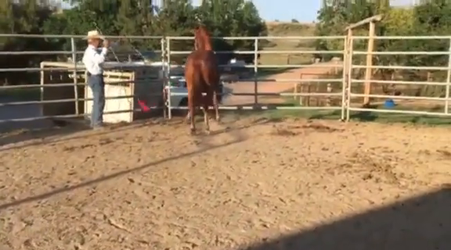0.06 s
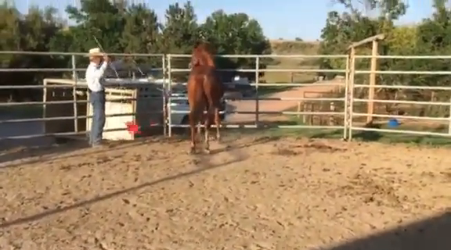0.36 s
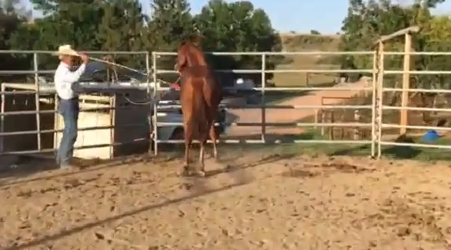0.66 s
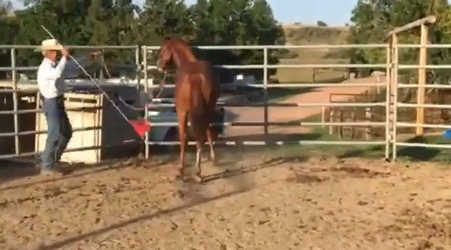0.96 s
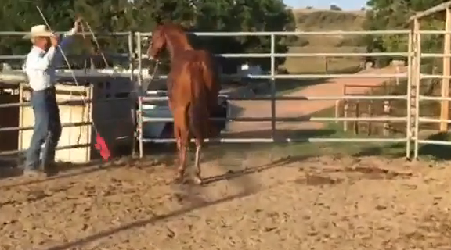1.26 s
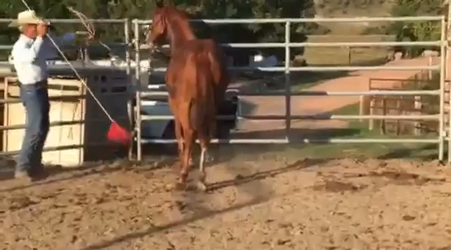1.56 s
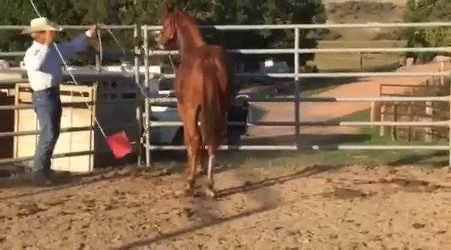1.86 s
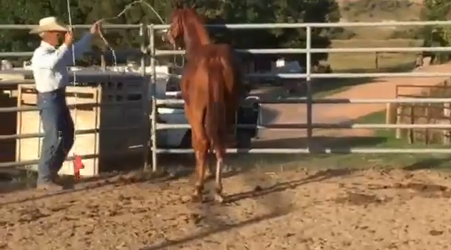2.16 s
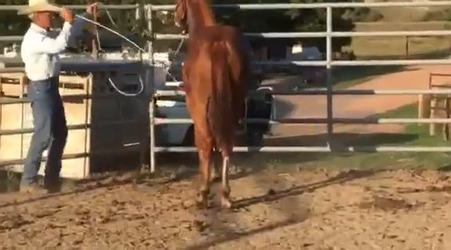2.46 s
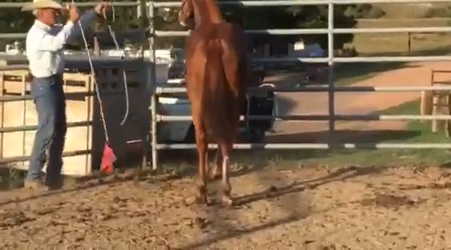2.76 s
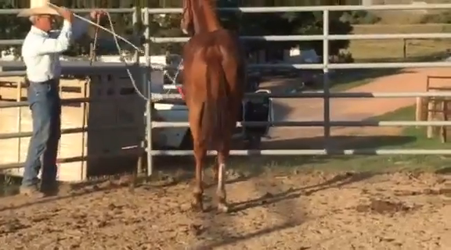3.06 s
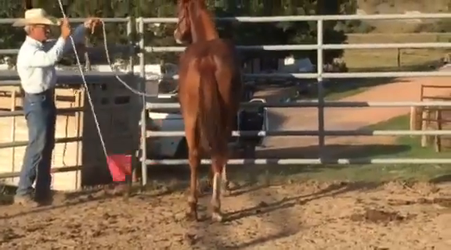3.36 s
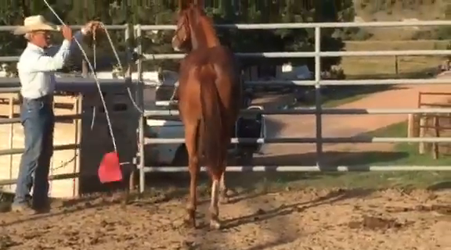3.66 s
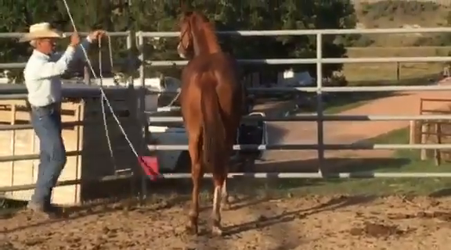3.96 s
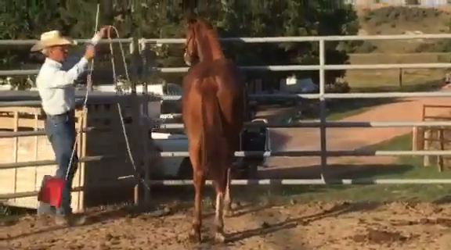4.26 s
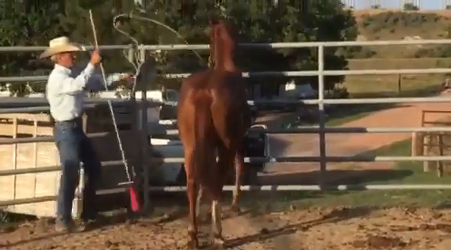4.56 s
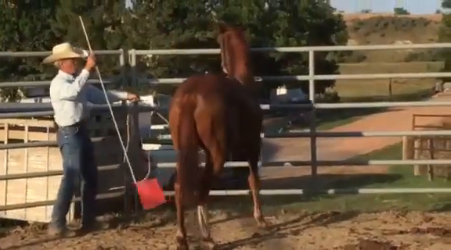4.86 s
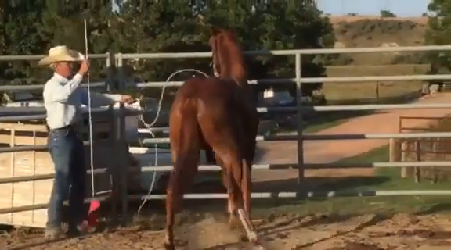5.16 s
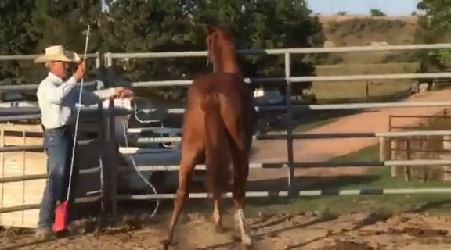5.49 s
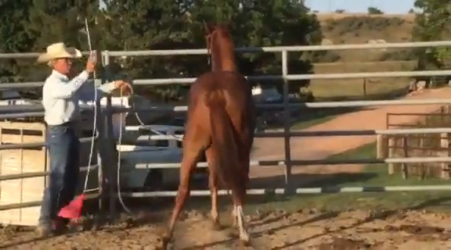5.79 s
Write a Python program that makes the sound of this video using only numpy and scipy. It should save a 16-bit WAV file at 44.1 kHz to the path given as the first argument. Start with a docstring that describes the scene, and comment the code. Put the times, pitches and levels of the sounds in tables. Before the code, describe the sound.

Uneven hoof thuds, taps and gritty scuffs on soil, broken by three sharp knocks on a humming, rattling metal fence.

```python
"""Young horse in a pen

A young horse shifts about a dirt pen: hooves thud on the soil, tap, scuff through grit and kick up dirt.
Three sharp knocks land on the metal fence panels, which hum and rattle; once a steel fitting clinks.
The yard answers with a far slap and a thin tail of echo, over quiet outdoor air."""
import sys
import numpy as np
from scipy import signal
from scipy.fft import rfft, irfft, next_fast_len
from scipy.io import wavfile
from scipy.ndimage import map_coordinates

SR = 44100
rng = np.random.default_rng(int(sys.argv[2]) if len(sys.argv) > 2 else 0)


def inscribe(sig):
    """Save sig as 16-bit PCM at rate SR to the path in sys.argv[1].

    A 1-D sig is mono; a 2-D sig holds one channel per row.
    Samples are clipped to [-1, 1] before scaling.
    """
    pcm = np.round(np.clip(np.atleast_2d(sig).T, -1, 1) * 32767)
    wavfile.write(sys.argv[1], SR, pcm.astype(np.int16))


N = 261513


def amp(db):
    """Turn decibels into a volume multiplier."""
    return 10 ** (np.asarray(db) / 20)


def fade(t, fade_s):
    """Die away by 60 dB every fade_s seconds."""
    return amp(-60 * t / fade_s)


def unit(x):
    """Scale x to an average strength (rms) of 1."""
    return x / np.sqrt(np.mean(x ** 2) + 1e-20)


def along(points, hz):
    """Read between the rows of a (pitch_hz, value) table, on a musical pitch scale."""
    pitches, values = np.transpose(points)
    return np.interp(np.log(hz + 1), np.log(pitches + 1), values)


def seconds(length_s):
    """The time of each sample."""
    return np.arange(int(length_s * SR)) / SR


def add(track, start_s, x):
    """Mix x into the track at start_s."""
    start = max(0, round(start_s * SR))
    track[start:start + len(x)] += x[:max(0, N - start)]


def filtered(x, response):
    """Turn each pitch in x up or down by response(hz)."""
    size = next_fast_len(len(x) + 8192)
    return irfft(rfft(x, size) * response(np.fft.rfftfreq(size, 1 / SR)), size)[:len(x)]


def wobble(size, per_s):
    """A smooth curve through per_s random points a second."""
    return map_coordinates(rng.standard_normal(2048), [np.arange(size) * per_s / SR], mode="wrap")


def noise(tone, size, grain_db=0):
    """Noise shaped by a tone table; grain_db clumps it into grains about a millisecond long."""
    clumps = np.tanh(wobble(size, 1000))
    grainy = rng.standard_normal(size) * amp(grain_db * clumps)
    return unit(filtered(grainy, lambda hz: amp(along(tone, hz))))


# the tone of outdoor air: pitch_hz, level_db
AIR_TONE = [(15, -43.5), (25, -16), (58, 6.5), (80, 5), (351, -8.5), (709, -11.5), (840, -12.5),
            (1120, -13), (2380, -15.5), (2540, -11), (2700, -18), (4810, -21.5), (6750, -24), (7620, -24.5),
            (8200, -46), (10700, -70), (18000, -120)]


def air():
    """Quiet outdoor air whose level drifts a little."""
    return amp(-67.5 + .99 * wobble(N, 4)) * noise(AIR_TONE, N, grain_db=.5)


# how long the yard echoes: pitch_hz, fade_s
YARD_FADES = [(100, 0.43), (500, .5), (1500, 0.68), (4000, 1), (8000, 0.2)]


def yard_echo(x):
    """Trees and sheds scatter the sound back as a thin tail."""
    hz, t, bands = signal.stft(rng.standard_normal(SR), SR, nperseg=256)
    tail = signal.istft(bands * fade(t, along(YARD_FADES, hz)[:, None]), SR, nperseg=256)[1]
    return amp(-25) * signal.fftconvolve(x, tail / np.linalg.norm(tail))[:N]


# steel touching steel: start_s, level_db
STEEL_TOUCHES = [(2.118, -46.5), (2.129, -41.5)]
# the notes the steel rings with: pitch_hz, level_db, fade_s
STEEL_NOTES = [(1729.4, -2.5, 2.7), (1883, -11.5, 1.1), (1960, -8.5, 1.2), (2350, -10.5, 0.89),
               (2470, -9.5, 0.61), (2850, -6.5, 0.5), (3160, -9, 0.67), (3224, -10.5, 0.51),
               (3733, -7.5, 0.15), (4020, -19, 0.52), (4496, -31, .55), (5100, -15, 0.32),
               (5270, -8.5, 0.4), (5300, -8.5, 0.38), (5300, -5.5, 0.49), (5400, -8.5, 0.67),
               (5800, -11.5, 0.27), (6870, -5.5, 0.095), (7550, -25, .4), (7530, -10, 0.22)]
# the tone of its jingle: pitch_hz, level_db
JINGLE_TONE = [(900, -30), (1500, -14.5), (1800, 2), (2400, -4.5), (3300, -5), (4300, -5.5), (5200, -3.5),
               (5800, 0), (6900, -5), (7700, -13.5), (8300, -10)]


def clinks():
    """A loose steel fitting jingles; its notes flutter as it keeps chattering against the rail."""
    out, t = np.zeros(N), seconds(2)
    for start_s, level_db in STEEL_TOUCHES:
        strike, jangle = 1.2 * fade(t, .053), .6 * fade(t, .37)
        ring = noise(JINGLE_TONE, len(t), grain_db=2) * (strike + jangle)
        for hz, note_db, fade_s in STEEL_NOTES:
            steady = .4 * np.exp(2j * np.pi * rng.random())
            flutter = .36 * (wobble(len(t), 85) + 1j * wobble(len(t), 85))
            note = np.real((steady + flutter) * np.exp(2j * np.pi * hz * t))
            ring += amp(note_db) * fade(t, fade_s) * note
        add(out, start_s, amp(level_db) * ring)
    return out


# the tones of falling clods and of sand: pitch_hz, level_db
CLOD_TONE = [(40, -10), (120, 10), (200, 1), (290, 8.5), (400, -5), (600, -4), (1000, -50)]
SAND_TONE = [(300, -1.5), (600, -4.5), (1200, -1.5), (1900, -5.5), (2600, -16), (3600, -21), (4500, -28.5),
             (8000, -42)]


def dirt_spray(start_s=1.392, rise_s=.081):
    """Kicked-up dirt patters down: dull clods and a wash of sand swell together and die away."""
    out, t = np.zeros(N), seconds(.5)
    swell = np.minimum(t / rise_s, 1) ** 1.23
    since_peak = np.maximum(t - rise_s, 0)
    clods = amp(-45) * fade(since_peak, .43) * noise(CLOD_TONE, len(t), grain_db=11)
    sand = amp(-43) * fade(since_peak, .31) * noise(SAND_TONE, len(t), grain_db=3.5)
    add(out, start_s, swell * (clods + sand))
    return out


def hoof_hollow(x, pitch_hz=1260, bounce=.68):
    """Sound bounces in the hollow under a hoof; its note sinks as the gap opens."""
    t = np.arange(len(x)) / SR
    round_trip = lambda hz: bounce * np.exp(-2j * np.pi * hz / pitch_hz) / (1 + (hz / 7500) ** 2)
    ringing = filtered(x, lambda hz: 1 / (1 - round_trip(hz)))
    speed = .82 + .18 * np.exp(-t / .08)  # slowing down lowers the pitch
    return unit(map_coordinates(ringing, [np.cumsum(speed)]))


# the tones of shoved soil, a scraping hoof and scattered grit: pitch_hz, level_db
SOIL_TONE = [(40, -13.5), (130, -4.5), (300, -0.5), (550, 0), (900, -18), (2000, -53.5)]
SCRAPE_TONE = [(300, -30), (490, -13), (630, 3), (800, -1), (1150, -8.5), (1700, -2.5), (2500, -19.5),
               (4500, -36.5)]
GRIT_TONE = [(1500, -20.5), (2200, -20), (2750, 7), (4300, -4), (5600, -7), (7000, -6), (8200, -13)]


def scuff(length_s, level_db, depth):
    """A dragged hoof scatters grit (depth 0), scrapes (about halfway) or shoves soil (depth 1)."""
    t = seconds(.5)
    share = lambda loudest_depth: amp(-33 * (depth - loudest_depth) ** 2)
    bite = 1 - np.exp(-(t / (.23 * length_s)) ** 2)
    stroke = 1.3 * bite * np.exp(-(t / (.97 * length_s)) ** 1.9)
    settle = bite * amp(-12.5) * fade(t, .09)  # loose dirt coming to rest
    soil = share(1) * noise(SOIL_TONE, len(t), grain_db=5)
    scrape = share(.55) * hoof_hollow(noise(SCRAPE_TONE, len(t), grain_db=4))
    grit = share(.02) * hoof_hollow(noise(GRIT_TONE, len(t), grain_db=9))
    return amp(level_db) * (stroke * soil + (stroke + settle) * (scrape + grit))


# hooves scuffing dirt: start_s, length_s, level_db, depth (0 to 1)
HOOF_SCUFFS = [(0.056, .047, -51, 0.34), (0.128, .035, -55, 1), (0.246, .085, -56, 0.63),
               (.334, .017, -51, 0.056), (0.426, 0.041, -64, 0.33), (.602, .016, -47.5, 0.017),
               (.634, .035, -61, .9), (.835, .025, -54.5, 0.91), (0.859, .029, -48.5, 0.2),
               (.904, .045, -57.5, 0.65), (1.113, .018, -56, 1), (1.162, .025, -53, 0.017),
               (1.204, .037, -56, .72), (1.767, .034, -52.5, 0.27), (2.023, .075, -52, 0.43),
               (2.287, .045, -54, 0.42), (2.382, 0.028, -62.5, .42), (2.493, .05, -61, .85),
               (2.583, .03, -48.5, .38), (2.931, 0.029, -59, 0.147), (3.039, .03, -57.5, 0.62),
               (3.498, .035, -54.5, 0.46), (3.688, .012, -54, .55), (3.71, .04, -59, .6),
               (4.18, .045, -54.5, 0.48), (4.408, .03, -52.5, 0.45), (4.659, .042, -51, 0.53),
               (4.906, 0.012, -41.5, 0.41), (4.914, .05, -51, 0.55), (5.061, .03, -58.5, 0.47),
               (5.181, .016, -52, 0.27), (5.383, .024, -51, .35), (5.415, 0.07, -62, .45),
               (5.498, 0.0081, -47.5, 0.96)]


def scuffs(shuffles_per_s=.78):
    """Hooves drag through the dirt, with faint shifts of weight at random times."""
    out = np.zeros(N)
    for start_s, length_s, level_db, depth in HOOF_SCUFFS:
        add(out, start_s, scuff(length_s, level_db, depth))
    shuffles = rng.random((int(shuffles_per_s * N / SR), 2))
    for k, (offset, depth) in enumerate(shuffles):
        add(out, (k + offset) / shuffles_per_s, scuff(length_s=.025, level_db=-71, depth=depth))
    return out


# the tone of a dull crunch, as of crushed soil: pitch_hz, level_db
CRUSH_TONE = [(40, -14), (130, -11), (290, 2.5), (400, 2), (520, -6), (900, -20), (2000, -50.5)]


def push(start_hz, fade_s, rest_hz=63, sink_s=.0034):
    """A dull push whose pitch sinks quickly; a faster blow starts higher and crunches more."""
    t = seconds(.25)
    pitch_hz = rest_hz + (start_hz - rest_hz) * np.exp(-t / sink_s)
    thump = -np.sin(2 * np.pi * np.cumsum(pitch_hz) / SR) * fade(t, fade_s)
    crush_shape = amp(-12) * fade(t, .067) * (1 - np.exp(-t / .0005))
    return thump + start_hz / 330 * crush_shape * noise(CRUSH_TONE, len(t))


# dull thuds of hooves landing on soil, and one low bump of the fence panel:
# start_s, level_db, start_pitch_hz, fade_s
DULL_THUDS = [(0.068, -46.5, 202, .11), (.523, -43.5, 170, .19), (.616, -33.5, 330, .1),
              (1.3576, -28.5, 260, .025), (1.3692, -35, 260, .12), (2.269, -33, 330, .075),
              (2.6126, -36.5, 560, .03), (2.691, -37, 380, .08), (2.978, -47.5, 220, .04),
              (4.327, -34, 169.2, .12), (4.678, -36, 300, .1), (4.912, -44, 350, .065),
              (5.5014, -32, 330, 0.16)]


def thuds():
    """The soil, or once the fence panel, gives under a blow; soft ground gives for longer."""
    out = np.zeros(N)
    for start_s, level_db, start_hz, fade_s in DULL_THUDS:
        add(out, start_s, amp(level_db) * push(start_hz, fade_s))
    return out


# the tone of a hoof's sharp crack: pitch_hz, level_db
CRACK_TONE = [(300, -22.5), (540, -32), (820, -1), (1100, 8.5), (1450, -7.5), (1900, 10.5), (2600, -4.5),
              (3400, -3.5), (4500, -8), (6500, -15), (8000, -27.5)]


def hoof_hit(pitch_hz, ring_db, crack_db):
    """One hard touch makes the hoof ring for a moment under a brief crack."""
    t = seconds(.1)
    ring = np.sin(2 * np.pi * pitch_hz * t) * fade(t, .012) * (1 - np.exp(-(t / .0014) ** 2))
    crack_fade = fade(t, .0089) + amp(-14.5) * fade(t, .055)
    crack = noise(CRACK_TONE, len(t)) * crack_fade * (1 - np.exp(-t / .0002))
    return amp(ring_db) * ring / np.abs(ring).max() + amp(crack_db) * crack


# light hoof taps: start_s, ring_db, pitch_hz, crack_db
HOOF_TAPS = [(0.065, -40, 1020, -46), (.373, -49.5, 1130, -51.5), (.819, -39, 910, -60),
             (.855, -41, 587, -80), (0.868, -58, 1310, -41.5), (.9498, -34, 1250, -60),
             (1.3681, -36.5, 720, -41), (2.023, -47, 990, -55), (2.2695, -44, 1050, -48),
             (2.6125, -34, 720, -42), (3.31, -32, 1760, -31), (4.912, -55, 1190, -41),
             (5.5005, -42.5, 1000, -46.5)]


def taps():
    """A hoof lightly touches something hard."""
    out = np.zeros(N)
    for start_s, ring_db, pitch_hz, crack_db in HOOF_TAPS:
        add(out, start_s, hoof_hit(pitch_hz, ring_db, crack_db))
    return out


# blows that shake the fence panels: start_s, hum_db, rumble_db, rattle_db
PANEL_BLOWS = [(2.291, -51.5, -57.5, -53), (2.666, -51.5, -48.5, -31.5), (3.282, -43.5, -48, -31.5),
               (3.978, -30, -43.5, -30.5), (4.331, -61, -52.5, -73)]
# the low notes of a bending panel: pitch_hz, level_db, fade_s
PANEL_NOTES = [(60.3, -2.5, 1), (126, -6.5, 0.53), (213, -20, 0.3), (276, -10, 0.32), (398, -19, 0.099)]
# the tones of its rumble and its rattling joints: pitch_hz, level_db
RUMBLE_TONE = [(40, -12), (90, 4), (170, 5), (290, 0), (390, -18), (520, -40)]
RATTLE_TONE = [(200, -9.5), (550, -16), (800, -10), (1100, -3.5), (1600, 3.5), (2100, -5.5), (2320, -7),
               (2600, -8.5), (3300, -12.5), (4500, -17), (5200, -20.5), (8000, -29.5)]


def panels():
    """A struck panel bends back and forth, humming and rumbling while its loose joints rattle."""
    out, t = np.zeros(N), seconds(.89)
    rise = 1 - np.exp(-t / .0065)
    ticks_per_s = 90
    for start_s, hum_db, rumble_db, rattle_db in PANEL_BLOWS:
        hum = sum(amp(db) * fade(t, fade_s) * np.sin(2 * np.pi * hz * t)
                  for hz, db, fade_s in PANEL_NOTES)
        rumble = noise(RUMBLE_TONE, len(t), grain_db=-.5) * fade(t, .43)
        # single ticks of the joints stand out of the dense chatter
        clicks = (rng.random(len(t)) < ticks_per_s / SR) * rng.uniform(-1, 1, len(t))
        ticks = unit(filtered(clicks, lambda hz: amp(along(RATTLE_TONE, hz))))
        chatter = noise(RATTLE_TONE, len(t)) * amp(.89 * np.tanh(wobble(len(t), 120)))
        rattle_tail = (1.1 * chatter + .5 * ticks) * amp(-9) * fade(t, .52)
        rattle = chatter * fade(t, .08) + rattle_tail
        shake = amp(hum_db) * hum + amp(rumble_db) * rumble + amp(rattle_db) * rattle
        add(out, start_s, shake * rise)
    return out


# a hoof striking the fence, three quick touches each time:
# start_s, gap_s, first_db, second_db, third_db, first_pitch_hz, crack_db, push_db, slap_db
FENCE_KNOCKS = [(2.659, 0.004, -23.5, -3, -14.5, 985, -12, -16, -27.5),
                (3.268, 0.0061, -11, -13, -5, 870, -7.5, -19, -22.5),
                (3.9693, .0064, -26.5, -6, -27.5, 985, -9.5, -27.5, -22.5)]


def knocks(slap_delay_s=.0848):
    """The hoof brushes the dirt, then chatters against the fence with the leg's weight behind it."""
    out = np.zeros(N)
    for start_s, gap_s, *touches_db, first_hz, crack_db, push_db, slap_db in FENCE_KNOCKS:
        add(out, start_s - .013, scuff(length_s=.012, level_db=-52.5, depth=.65))
        add(out, start_s + gap_s / 2, amp(push_db) * push(start_hz=300, fade_s=.023))
        for k, touch_db in enumerate(touches_db):
            touch_s = start_s + k * gap_s
            pitch_hz = first_hz * 1.09 ** k  # higher as the hoof closes on the rail
            touch = hoof_hit(pitch_hz, touch_db, crack_db + .42 * touch_db)  # even light touches crack
            add(out, touch_s, touch)
            if touch_db == max(touches_db):  # a far wall slaps back the hardest touch
                add(out, touch_s + slap_delay_s, amp(slap_db) * touch)
    return out


def scene():
    """Horse and fence in the open yard, in one channel."""
    near = knocks() + taps() + thuds() + scuffs() + dirt_spray() + panels() + clinks()
    return (air() + near + yard_echo(near))[None]


def record(dry):
    """Round off the loudest peaks and cut the treble above top_hz."""
    peak_limit, top_hz = .72, 8000
    rounded = dry / (1 + (dry / peak_limit) ** 4) ** (1 / 4)
    return np.array([filtered(x, lambda hz: 1 / np.sqrt(1 + (hz / top_hz) ** 120)) for x in rounded])


dry = scene()
out = record(dry)
inscribe(out)
```